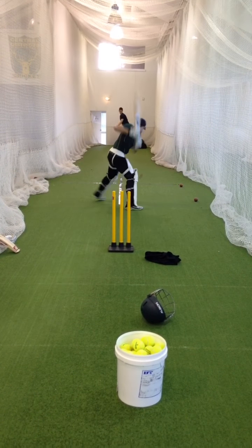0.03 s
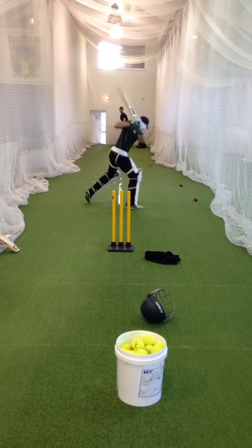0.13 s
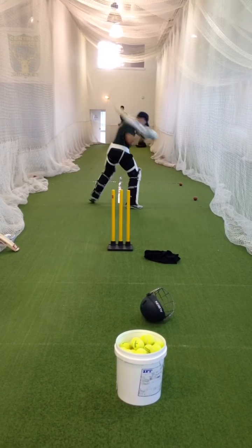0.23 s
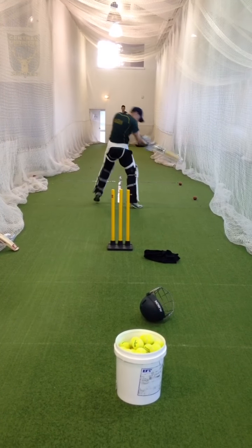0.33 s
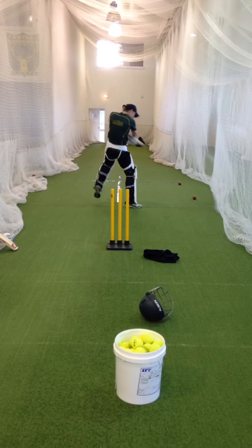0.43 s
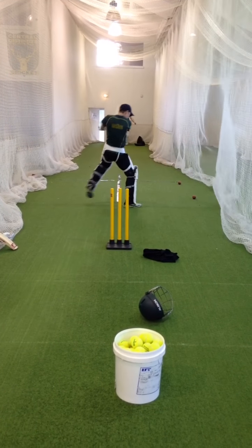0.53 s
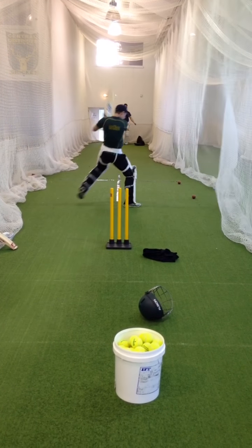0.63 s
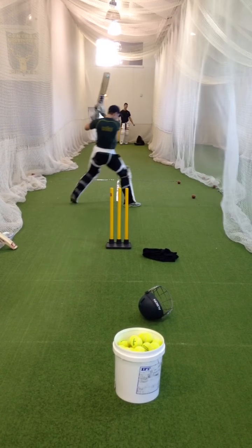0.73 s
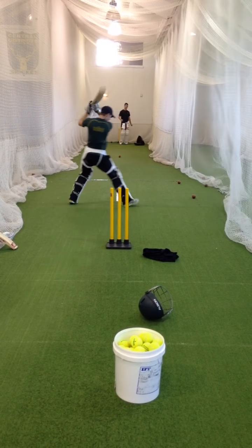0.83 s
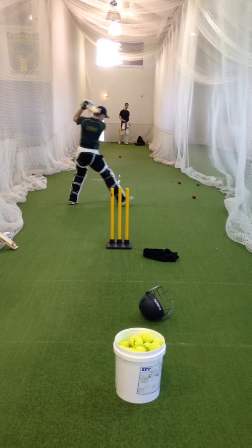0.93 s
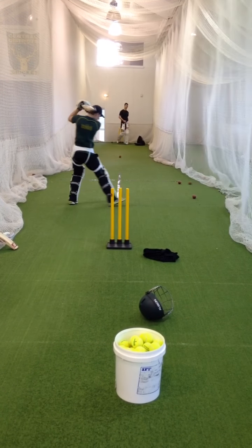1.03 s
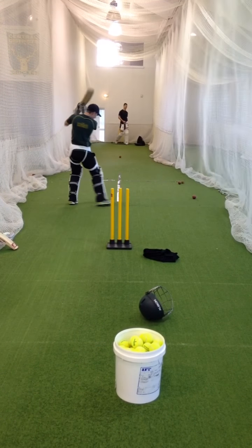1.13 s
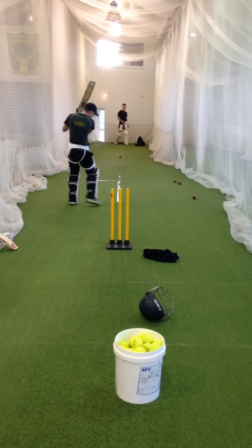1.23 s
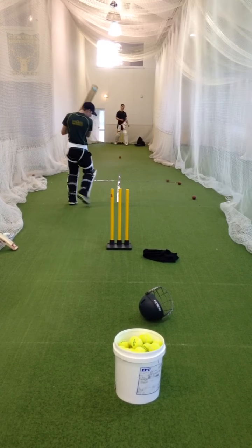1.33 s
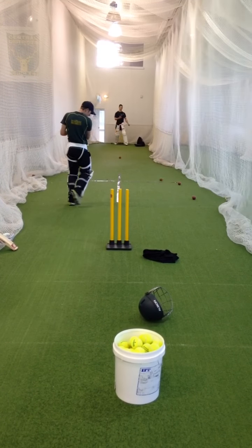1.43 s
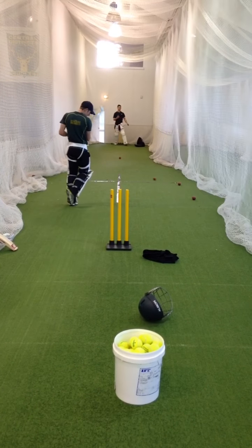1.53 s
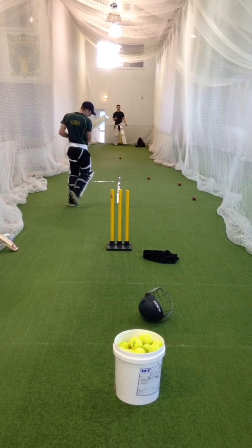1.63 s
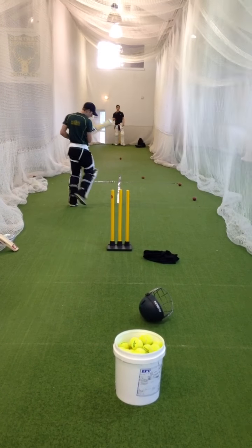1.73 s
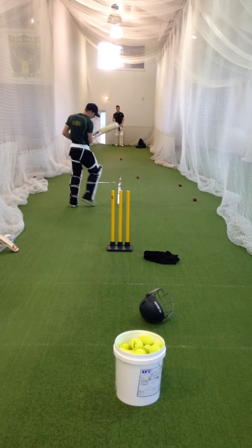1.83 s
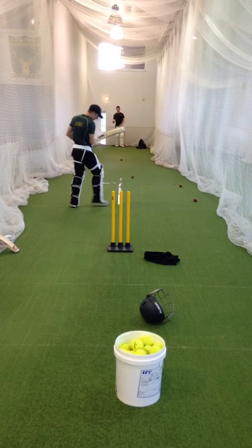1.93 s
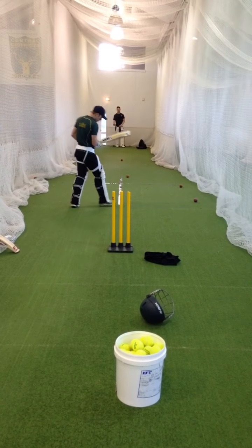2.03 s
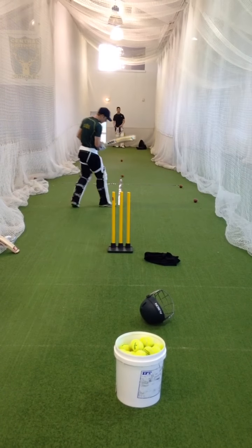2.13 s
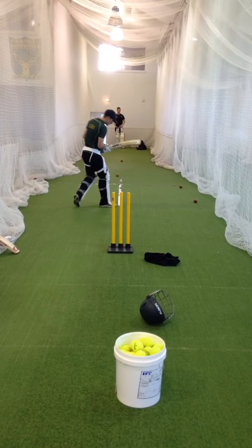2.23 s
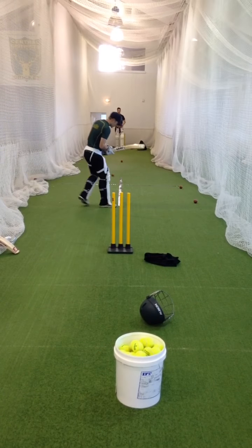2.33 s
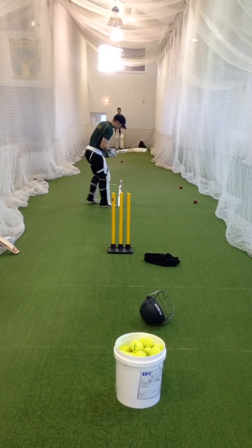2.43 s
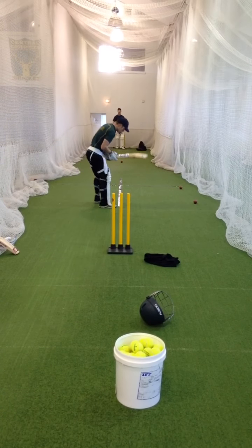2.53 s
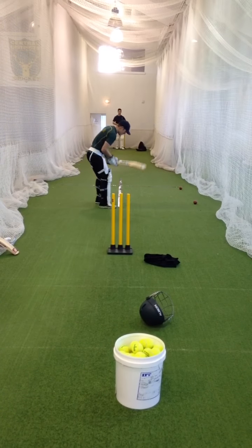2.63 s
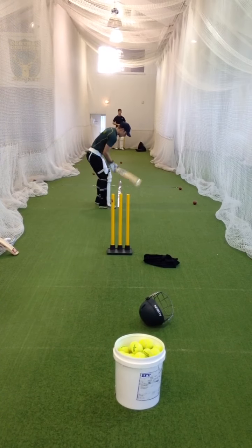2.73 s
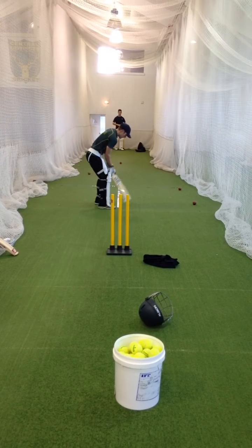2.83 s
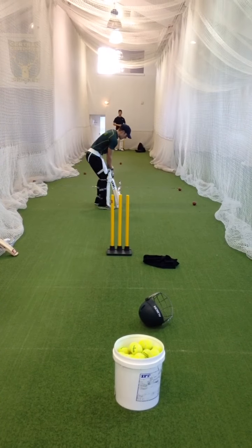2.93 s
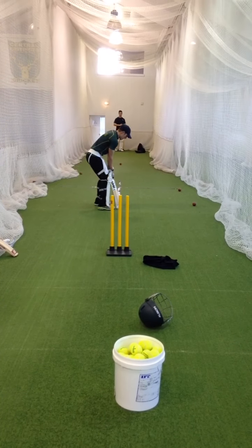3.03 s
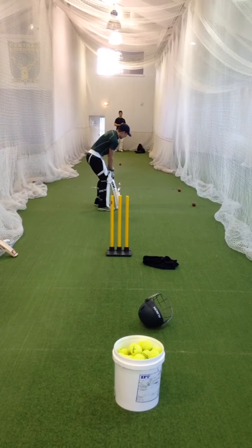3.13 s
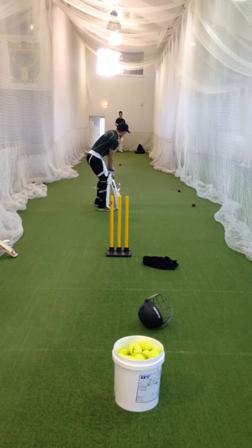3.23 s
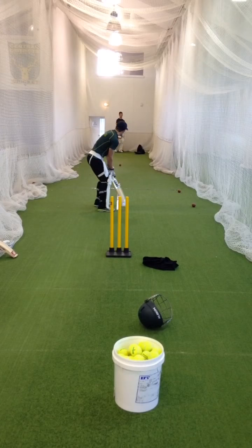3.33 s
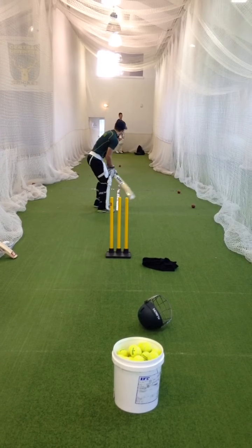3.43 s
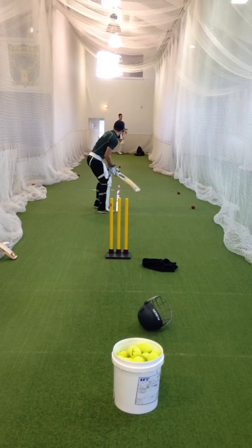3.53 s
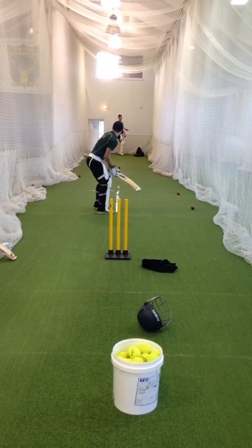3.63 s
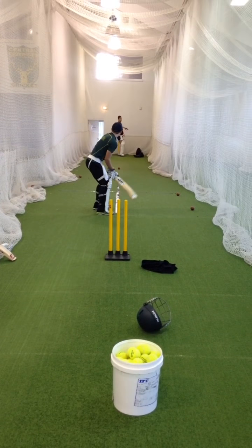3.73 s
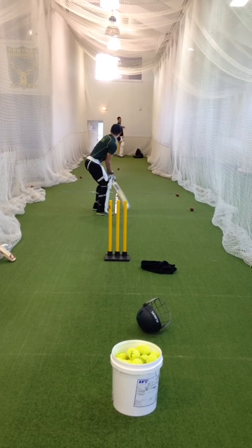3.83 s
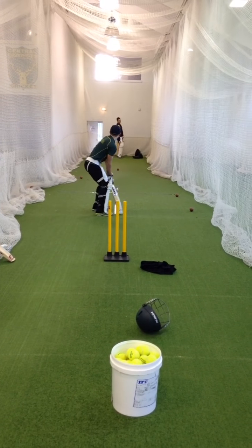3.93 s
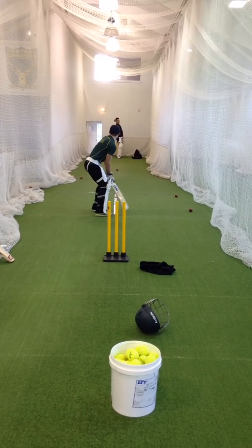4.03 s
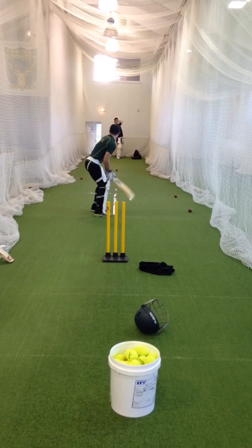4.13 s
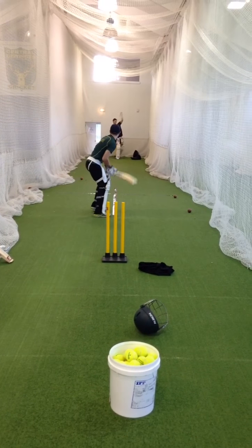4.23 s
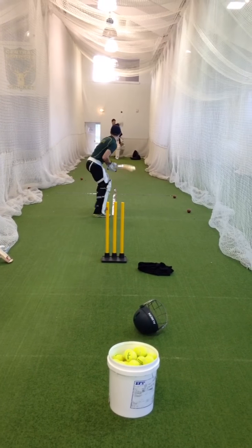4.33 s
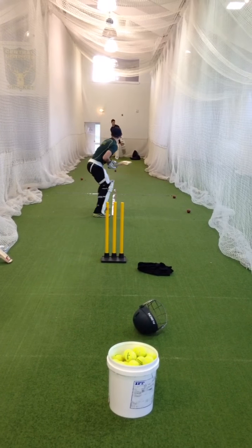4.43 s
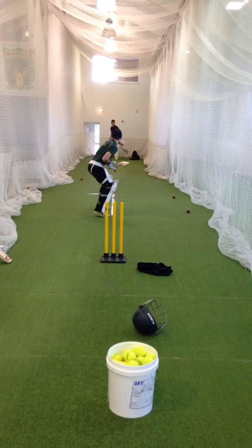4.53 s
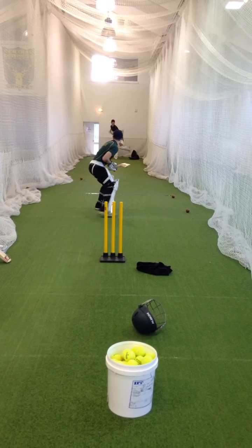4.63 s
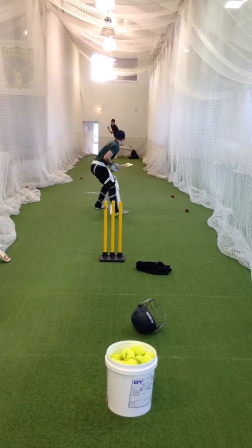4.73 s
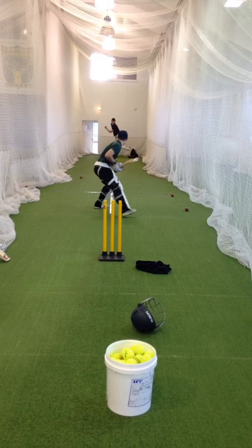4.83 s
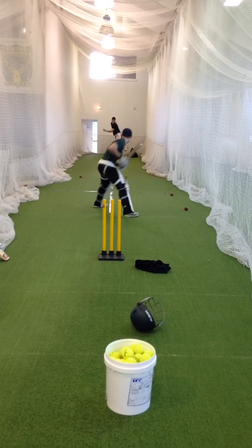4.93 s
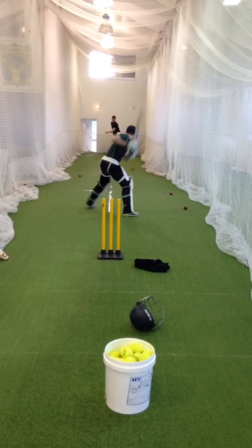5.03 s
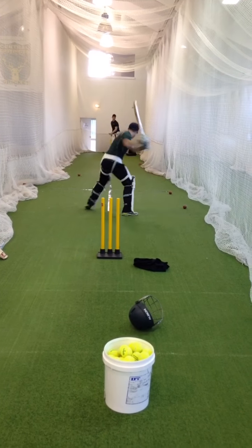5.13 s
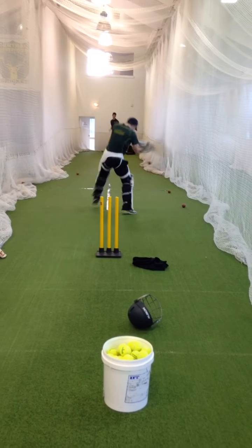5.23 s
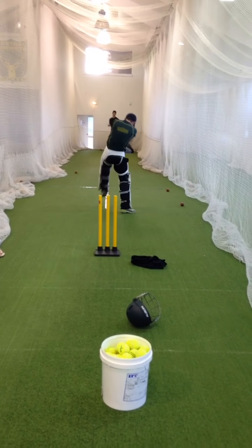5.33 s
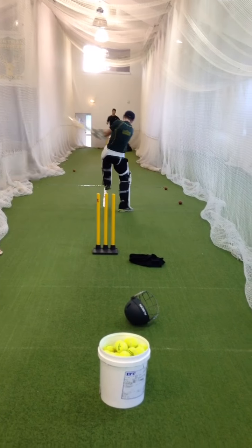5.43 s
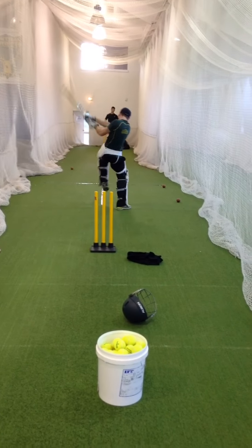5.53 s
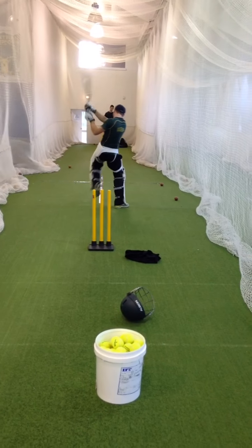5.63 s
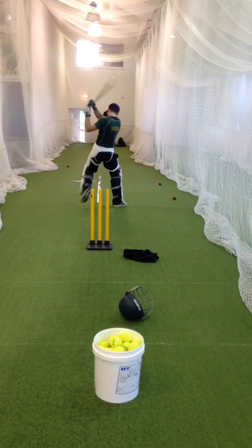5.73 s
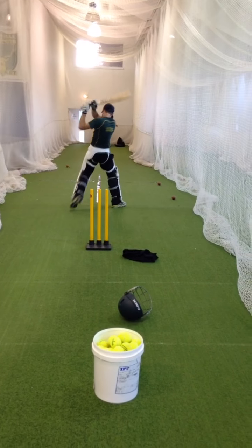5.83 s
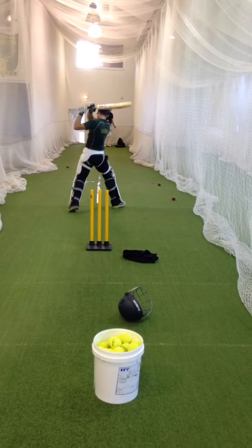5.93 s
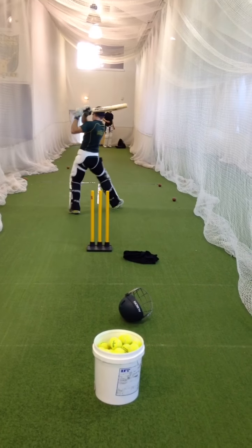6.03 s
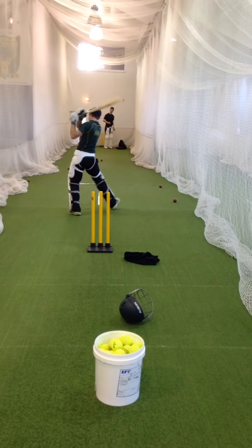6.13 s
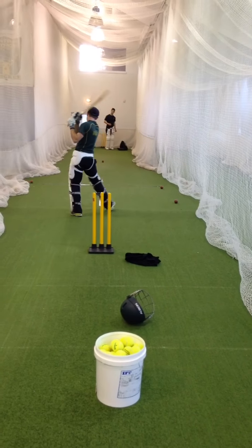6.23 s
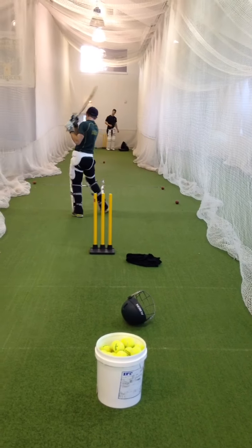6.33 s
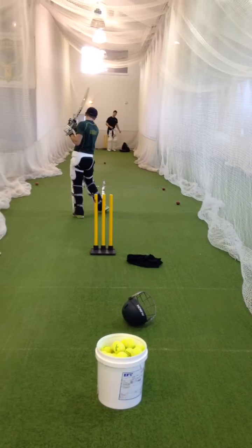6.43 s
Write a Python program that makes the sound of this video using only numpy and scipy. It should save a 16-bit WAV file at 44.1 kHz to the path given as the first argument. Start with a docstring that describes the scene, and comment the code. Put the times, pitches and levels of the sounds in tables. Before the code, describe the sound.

Two sharp, ringing cracks of a cricket bat in an echoing sports hall, each just after the ball's dull bounce.

```python
"""A bat cracks against a ball in the practice nets of a large sports hall, one microphone behind the stumps.
Twice the ball thuds on the matted floor and the stroke follows, sounding the blade's bending modes;
in between the batter taps the bat on the mat. Every blow comes back off the nets or walls and sets the
hall ringing. Shoes and pads scuff faintly over the rumble of the building."""
import sys
import numpy as np
from scipy import signal
from scipy.fft import rfft, irfft
from scipy.io import wavfile

SR = 44100
rng = np.random.default_rng(int(sys.argv[2]) if len(sys.argv) > 2 else 0)


def transcribe(signal):
    """Save signal, clipped to [-1, 1], as a 16-bit WAV file at the path in sys.argv[1]."""
    frames = np.atleast_2d(signal).T
    limited = np.clip(frames, -1, 1)
    pcm = np.round(limited * 32767).astype(np.int16)
    wavfile.write(sys.argv[1], SR, pcm)


N = 286164

# Bat on ball, just ahead of the microphone. Each row: start in seconds, hall energy in dB, direct sound
# in dB against that, first net echo's delay in seconds, net and wall echoes in dB against the direct sound.
BAT_STROKES = [(0.4218, 26.9, -7.8, .0125, -4.5, -5), (5.3707, 24.8, -6, .0085, -3.2, -8.5)]
# The contact, one list a stroke, the second harder. Each row: frequency in Hz, relative level in dB.
CRACK_SPECTRA = [
    [(80, -32), (230, -8), (450, -2.5), (780, 2), (1020, -3), (1300, 1.5), (1600, -5), (1900, -11.5),
     (2500, -12.5), (3000, -20.5), (4200, -16.5), (5500, -23), (9000, -28.5), (15000, -36.5)],
    [(80, -36), (230, -8), (450, -3.5), (700, 2), (1050, -1.5), (1350, -2.5), (1800, -6), (2400, -16),
     (3000, -16.5), (4300, -16), (5500, -20.5), (9000, -25.8), (15000, -38.5)],
]
# The blade's bending modes. Each row: centre and width in Hz, lift in dB in the first and second stroke.
BLADE_MODES = [(315, 46, -3.5, 0), (610, 82, 2, 4.5), (1436, 280, 7, 5.5), (2400, 310, 5, 6.5),
               (3620, 620, 6.5, -0.5)]
def bat_strokes(floor_s=.00135, floor_db=-2, wall_delays_s=(.0625, .1005)):
    """A hard contact excites the blade's bending modes, each according to where the ball meets it."""
    out = np.zeros(N)
    for k, (s, db, direct_db, net_s, net_db, wall_db) in enumerate(BAT_STROKES):
        modes = [(centre, width, lifts[k]) for centre, width, *lifts in BLADE_MODES]
        pulse = impact(lambda hz: at_hz(CRACK_SPECTRA[k], hz) + resonances(modes, hz))
        crack = crunched(pulse)
        nets = echo_run(net_s, gap_s=.003, first_db=net_db, loss_db=1.2, count=3)
        walls = [(delay, wall_db) for delay in wall_delays_s]
        add(out, s, from_db(db) * in_hall(pulse, crack, direct_db, nets + walls))
        add(out, s + floor_s, from_db(db + direct_db + floor_db) * crack)   # reflection off the floor
    return out


def crunched(pulse, split_hz=3900):
    """The ball crushes the wood fibres for a moment, spreading the contact's treble into a tiny burst."""
    body = signal.sosfilt(signal.butter(3, split_hz, fs=SR, output="sos"), pulse)
    edge = signal.sosfilt(signal.butter(3, split_hz, "high", fs=SR, output="sos"), pulse)
    fibres = noise_burst(decay_s=.0009, size=512)
    return body + signal.fftconvolve(edge, fibres)[:len(pulse)]


# The ball landing further down the net. Each row: start in seconds, hall energy in dB, direct sound
# in dB against that.
BALL_BOUNCES = [(0.0985, 32.6, -13.2), (4.9910, 25.8, -11.3)]
# Ball on mat, one list a bounce. Each row: frequency in Hz, relative level in dB.
BOUNCE_SPECTRA = [
    [(25, -21.5), (55, -9), (110, -6), (200, 1), (340, 2), (460, -1.5), (630, -13.5), (830, -15.5),
     (1200, -24), (1500, -38.5), (2500, -50.5), (12000, -100)],
    [(25, -20), (55, -7.5), (110, -5), (190, 2), (340, -4.5), (520, -5.5), (650, -10), (780, -15),
     (950, -15.5), (1500, -38.5), (2500, -51), (12000, -100)],
]
def ball_bounces():
    """The ball thuds on the mat, with one strong reflection from close by."""
    return thuds(BALL_BOUNCES, BOUNCE_SPECTRA, near_echoes=[(.01, 3)])   # seconds, dB


# Taps at the batter's feet. Each row: start in seconds, hall energy in dB, direct sound in dB against that.
BAT_TAPS = [(2.9940, 13.8, -5.5), (3.9985, 7.8, -4.5)]
# Bat on mat, one list a tap, the second softer. Each row: frequency in Hz, relative level in dB.
TAP_SPECTRA = [
    [(25, -21), (55, -4.5), (130, -4), (180, -1), (270, -5.5), (350, -14.5), (500, -33), (750, -44),
     (1200, -66), (8000, -92)],
    [(25, -15), (55, -3), (130, 0), (180, 3), (270, -9), (350, -18.5), (500, -32), (750, -48), (1200, -59),
     (8000, -101)],
]
def bat_taps():
    """The toe of the bat knocks dully on the mat."""
    return thuds(BAT_TAPS, TAP_SPECTRA, near_echoes=[])


# The floor under the mat. Each row: a mode's centre in Hz, width in Hz, lift in dB.
FLOOR_RESONANCES = [(97, 60, 3.5), (170, 45, 2.5), (340, 46, 5), (420, 6.7, 5)]
def thuds(blows, spectra, near_echoes, roof_trip_s=.0303):
    """The mat lengthens the contact and takes away the treble; the floor under it booms."""
    out = np.zeros(N)
    # The thud flutters between floor and roof, and comes back from the far end.
    flutter = echo_run(roof_trip_s, roof_trip_s, first_db=-3, loss_db=1, count=8)
    end_wall = [(.293, -10.5)]   # seconds, dB
    for (s, db, direct_db), spectrum in zip(blows, spectra):
        pulse = impact(lambda hz: at_hz(spectrum, hz) + resonances(FLOOR_RESONANCES, hz))
        add(out, s, from_db(db) * in_hall(pulse, pulse, direct_db, near_echoes + flutter + end_wall))
    return out


def in_hall(pulse, direct, direct_db, echoes):
    """A blow reaches the microphone directly, then off nets and walls, then as reverberation of energy 1."""
    heard = unit_energy(signal.fftconvolve(pulse, hall_tail()))
    add(heard, 0, from_db(direct_db) * direct)
    for delay, echo_db in echoes:
        add(heard, delay, from_db(direct_db + echo_db) * scattered(pulse))
    return heard


def echo_run(first_s, gap_s, first_db, loss_db, count):
    """Paths of slightly uneven length give a fading run of echoes, each a delay in seconds and a dB gain."""
    slips = .1 * rng.uniform(-1, 1, count)
    return [(first_s + (k + slip) * gap_s, first_db - k * loss_db) for k, slip in enumerate(slips)]


def scattered(pulse, cutoff_hz=9000, spray_db=-3):
    """An uneven, soft surface returns the pulse duller and with a short spray of weaker copies."""
    spray = from_db(spray_db) * noise_burst(decay_s=.0022, size=1024)
    spray[0] += 1
    dull = signal.sosfilt(signal.butter(1, cutoff_hz, fs=SR, output="sos"), pulse)
    return unit_energy(signal.fftconvolve(dull, spray))


# The hall all around the microphone. Each row: frequency in Hz, time to fall 60 dB in seconds.
HALL_DECAY = [(50, 1.1), (100, 0.73), (200, 1.19), (400, 1.54), (800, 1.6), (1500, 1.41), (2400, 1.25),
              (3600, .96), (6400, 0.53), (12800, 0.39)]
def hall_tail(build_s=.014, hold_s=.088, grain_s=.058, size=98304, bands=18):
    """Diffuse reflections: grainy at first, holding briefly, then dying fastest in the treble."""
    t, hz = np.arange(size) / SR, np.fft.rfftfreq(size, 1 / SR)
    grain_db = 3 * np.exp(-t / grain_s) * np.repeat(rng.standard_normal(size // 32), 32)
    reflections = rfft(rng.standard_normal(size) * from_db(grain_db))
    age = np.hypot(t, hold_s) - hold_s
    centres = np.geomspace(60, 14000, bands)
    tail = np.zeros(size)
    for weights, centre in zip(np.eye(bands), centres):
        band = irfft(reflections * np.interp(hz, centres, weights))
        tail += band * np.exp(-np.log(1000) * age / at_hz(HALL_DECAY, centre))
    return tail * (1 - np.exp(-t / build_s))


# Shoes and gloves between strokes, near the microphone. Each row: start in seconds, peak rms in dB,
# centre in Hz, length in seconds.
STANCE_SCUFFS = [(1.390, -58, 3870, .0048), (1.694, -60, 7930, .013), (1.798, -53.5, 2030, .0055),
                 (1.910, -61, 2400, .027), (2.028, -58.5, 3000, .04), (4.514, -53.5, 2200, .0024),
                 (4.648, -52.5, 1250, .016), (4.740, -62.5, 850, .033)]
# The bat's toe knocks, then brushes the pile. Each row: delay in seconds, level in dB against the tap,
# centre in Hz, width in octaves, length in seconds.
TOE_RUBS = [(.003, -63.5, 680, .5, .011), (.006, -72.5, 2300, 1.4, .022)]
# Soft footfalls by the stumps. Each row: start in seconds, peak rms in dB, centre in Hz.
FOOTFALLS = [(1.29, -43.5, 70), (1.43, -46, 70), (1.76, -55, 220), (2.04, -51.5, 85), (2.71, -53.5, 118),
             (2.80, -49, 107), (4.58, -57, 45), (6.41, -49.5, 135)]
def batter(scuff_octaves=1.05, step_octaves=.8, step_s=.042):
    """He strides to every bounce, brushes the mat with every tap and shuffles back into his stance."""
    rubs = [(s, db, hz, scuff_octaves, length) for s, db, hz, length in STANCE_SCUFFS]
    rubs += [(s + delay, db + rub_db, *shape) for s, db, _ in BAT_TAPS for delay, rub_db, *shape in TOE_RUBS]
    rubs += [rub for s, _, _ in BALL_BOUNCES for rub in stride(s)]
    steps = [(s, db, hz, step_octaves, step_s) for s, db, hz in FOOTFALLS]
    return movements(rubs, hall_db=-3.5) + movements(steps, hall_db=-6.5)


def stride(s, gap_s=.037, loss_db=1.3, count=7):
    """A shoe scuffs, then the pads rub at uneven moments, ever more faintly."""
    shoe = (s + .003, -46, 2200, .85, .03)   # start in seconds, dB, Hz, octaves, length in seconds
    moments = s + gap_s * (1 + np.arange(count) + rng.uniform(-.3, .3, count))
    pads = [(at, -56 - k * loss_db, 4000, 1.15, .024) for k, at in enumerate(moments)]
    return [shoe] + pads


def movements(rows, hall_db, size=16384):
    """Brief rubs and pushes that swell and fade, with a little of the hall."""
    out, t = np.zeros(N), np.arange(size) / SR
    for s, db, centre_hz, octaves, length in rows:
        rub = coloured_noise(lambda hz: -40 * np.log10(1 + (np.log2((hz + 1) / centre_hz) / octaves) ** 2),
                             size)
        age = 2 * t / length
        add(out, s, from_db(db) * rub * age * np.exp(1 - age))
    reverberation = signal.fftconvolve(out, unit_energy(hall_tail()))[:N]
    return out + from_db(hall_db) * reverberation


# Room tone at the microphone. Each row: frequency in Hz, relative level in dB.
ROOM_TONE = [(25, -14.5), (55, -3.5), (100, -0.5), (180, -8.5), (330, -15), (500, -21), (950, -26),
             (2000, -28.5), (5000, -30), (10000, -33), (15000, -33)]
def building(rms_db=-55.6):
    """The building rumbles steadily, with a faint hiss."""
    return from_db(rms_db) * coloured_noise(lambda hz: at_hz(ROOM_TONE, hz), N)


def impact(db_at, size=8192):
    """The shortest causal pulse with the spectrum db_at(Hz): a sudden start, then resonances ring out."""
    hz = np.fft.rfftfreq(size, 1 / SR)
    cepstrum = irfft(np.log(from_db(db_at(hz))))
    cepstrum[size // 2:] = 0
    return unit_energy(irfft(np.exp(rfft(2 * cepstrum))))


def resonances(modes, hz):
    """The lift in dB that modes give to a spectrum."""
    return sum(lift_db / (1 + (2 * (hz - centre) / width) ** 2) for centre, width, lift_db in modes)


def noise_burst(decay_s, size):
    """Dying noise of energy 1."""
    return unit_energy(rng.standard_normal(size) * np.exp(-np.arange(size) / SR / decay_s))


def coloured_noise(db_at, size):
    """Noise of rms 1 with the spectrum db_at(Hz)."""
    hz = np.fft.rfftfreq(size, 1 / SR)
    spectrum = rfft(rng.standard_normal(size)) * from_db(db_at(hz))
    return unit_energy(irfft(spectrum, size)) * np.sqrt(size)


def at_hz(points, hz):
    """Read a table on a log-frequency axis."""
    known, values = np.transpose(points)
    return np.interp(np.log(hz + 1e-3), np.log(known), values)


def from_db(db):
    return 10 ** (np.asarray(db) / 20)


def unit_energy(x):
    return x / np.sqrt(np.sum(x ** 2) + 1e-20)


def add(track, s, sound):
    """Mix a sound in from time s on."""
    start = max(round(s * SR), 0)
    track[start:start + len(sound)] += sound[:N - start]


def gain_control(x, threshold_db=-20, slope=.3, attack_s=.008, recovery_db_per_s=1.15, size=1024):
    """Loud blows turn the recorder's gain down quickly; it creeps back over seconds."""
    level_db = 10 * np.log10(signal.fftconvolve(x ** 2, np.ones(size) / size, "same") + 1e-9)
    excess_db = np.maximum(level_db - threshold_db, 0)
    recovery_db = recovery_db_per_s * np.arange(N) / SR
    cut_db = np.maximum.accumulate(slope * excess_db + recovery_db) - recovery_db
    pole = np.exp(-1 / (attack_s * SR))
    return x * from_db(-signal.lfilter([1 - pole], [1, -pole], cut_db))


def scene():
    """Strokes, thuds and the batter's movements over the building's rumble, in mono."""
    return (bat_strokes() + ball_bounces() + bat_taps() + batter() + building())[None]


def record(dry, low_cut_hz=30, high_cut_hz=15400):
    """The recorder loses the deepest bass, ducks its gain, flattens the highest peaks and cuts the top."""
    x = signal.sosfilt(signal.butter(2, low_cut_hz, "high", fs=SR, output="sos"), dry[0])
    x = gain_control(x)[None]
    x = x / (1 + (x / .95) ** 6) ** (1 / 6)
    return signal.sosfilt(signal.ellip(10, .1, 80, high_cut_hz, fs=SR, output="sos"), x)


dry = scene()
out = record(dry)
transcribe(out)
```